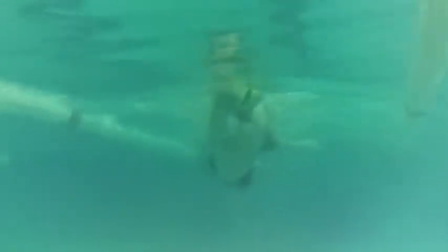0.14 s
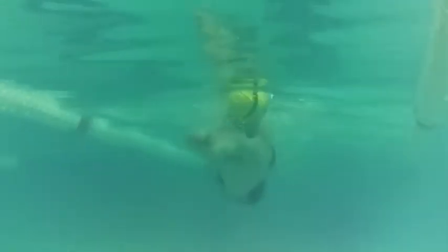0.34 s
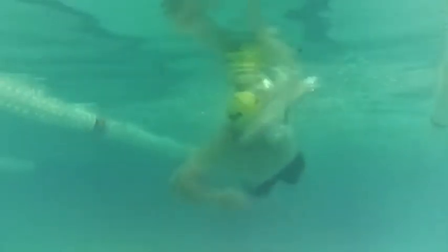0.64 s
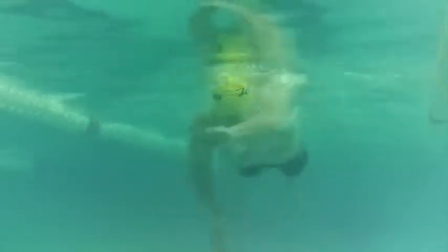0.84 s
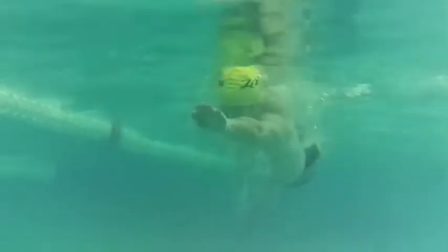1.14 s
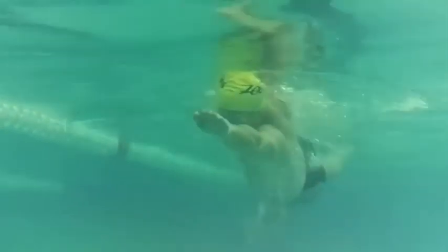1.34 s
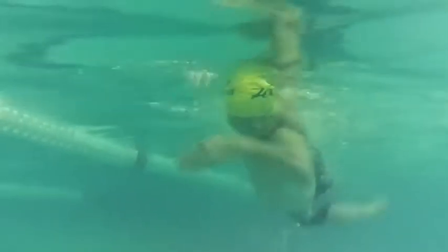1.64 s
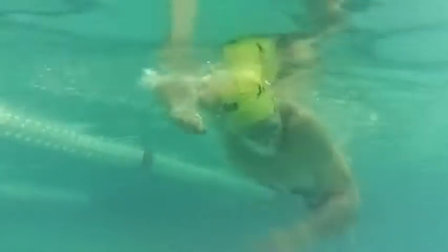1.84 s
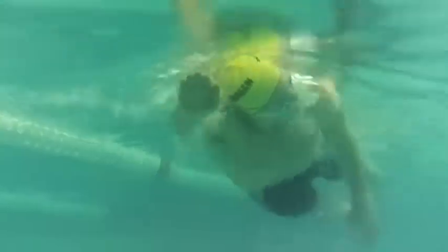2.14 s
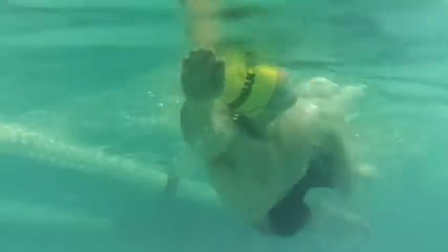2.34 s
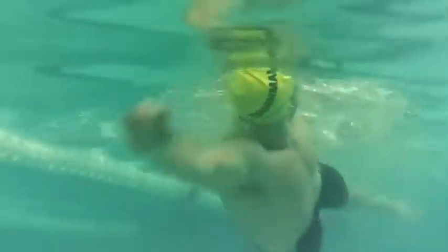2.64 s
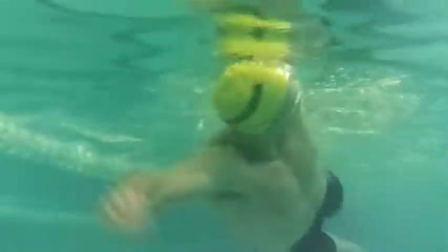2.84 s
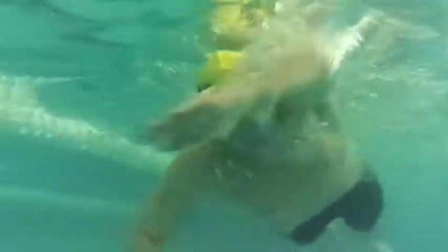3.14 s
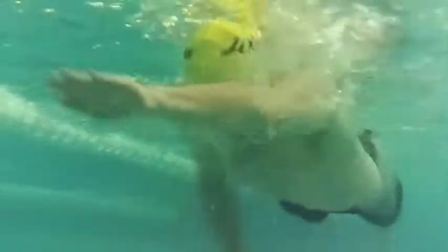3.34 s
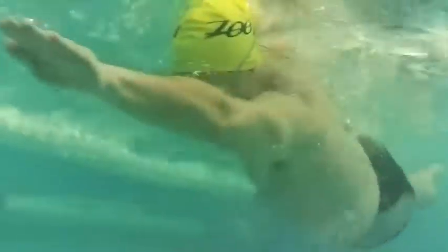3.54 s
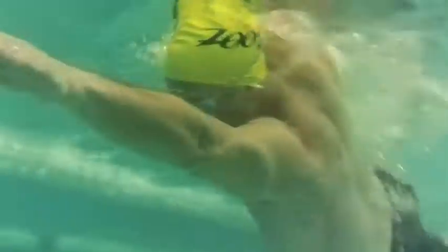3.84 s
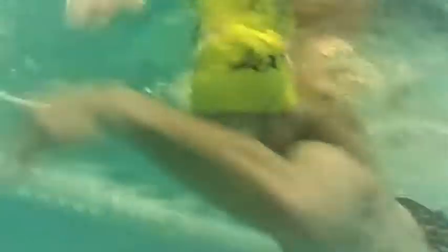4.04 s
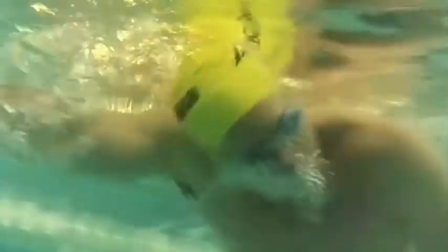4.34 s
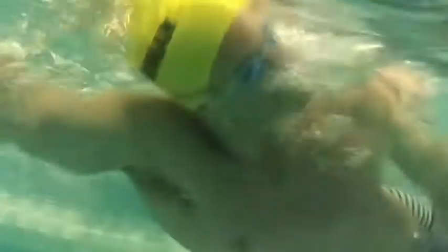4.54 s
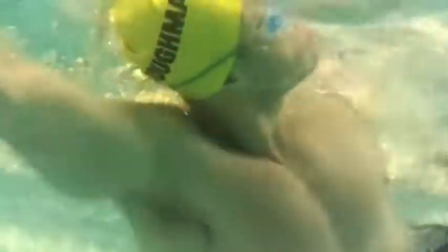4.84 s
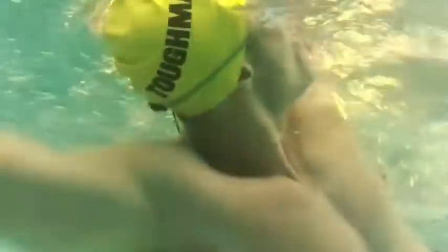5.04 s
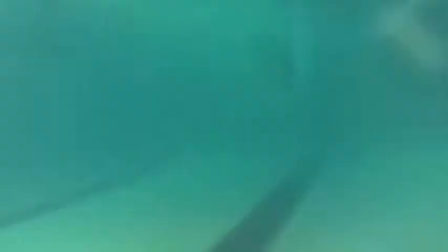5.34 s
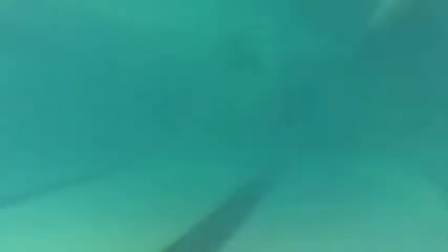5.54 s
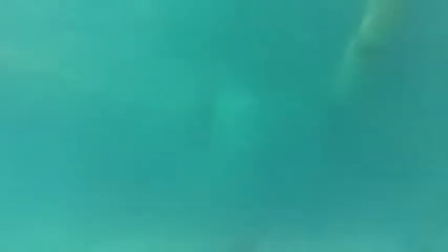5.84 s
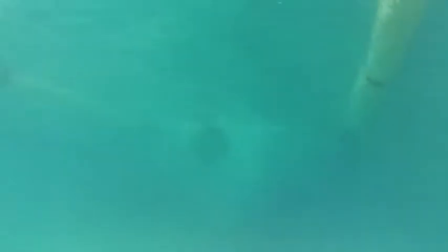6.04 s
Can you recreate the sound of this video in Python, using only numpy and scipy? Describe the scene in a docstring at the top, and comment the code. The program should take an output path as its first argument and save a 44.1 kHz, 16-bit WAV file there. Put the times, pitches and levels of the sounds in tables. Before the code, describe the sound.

Heard from inside a waterproof housing submerged in a pool, the sound is muffled and resonant, with low water rumble, faint hiss and a thin high whine. Tiny taps open it, then gritty squeaks of a grip rubbing at 0.3-0.4 s. A bubbly stroke rushes at 0.7 s, followed by quieter water, pops and chirps. Another surge at 1.9 s brings a sharp pop and short whistling bubble jets near 2.1 s; a weaker one follows at 2.5 s. Rubbing squeaks at 2.9-3.2 s lead into a stroke and a loud, distorted knock at 3.25 s. Deep gurgles continue until another hard knock at 3.94 s. The closest, fullest froth surges at 4.16 and 4.5 s, with plopping bubbles and knocks around 4.65-4.7 s. A lesser stroke at 5.0 s fades among ticks. Complete silence runs from 5.38 to 6.02 s, then dull water and a brief squeaky rub return.

```python
"""A swimmer strokes past under water, heard by a microphone in a waterproof housing below the surface of a pool.
Each stroke is noise and many ringing bubbles; the froth goes through the resonances of the housing walls.
Larger bubbles, pops, chirps, ticks and jets are added one by one, over a rumble of moving water.
Rubs and knocks on the housing overload the microphone. A faint whine and hiss come from the electronics.
The sound drops out for a moment near the end."""
import sys
import numpy as np
from scipy import signal
from scipy.fft import rfft, irfft
from scipy.io import wavfile
from scipy.ndimage import uniform_filter1d

SR = 44100
rng = np.random.default_rng(int(sys.argv[2]) if len(sys.argv) > 2 else 0)


def transcribe(u):
    """Save the signal u as a 16-bit wav file named by the first command-line argument.

    u: samples, shape (n,) or (channels, n), limited to [-1, 1]; the rate is SR.
    q: integer samples, one column per channel.
    """
    v = np.clip(np.atleast_2d(u).T, -1, 1)
    q = np.round(v * 32767).astype(np.int16)
    wavfile.write(sys.argv[1], SR, q)


N = 272538
TIME = np.arange(N) / SR  # seconds

# Water pushing on the housing. Each row: time in seconds, level in dB.
SWELL = [(0, -42.5), (.9, -43.5), (1.15, -50), (1.75, -41), (2.5, -47), (3.2, -40), (3.95, -44),
         (4.15, -39.5), (4.5, -34), (5.35, -46), (6.05, -36.5)]
# Tone of the low rumble. Each row: frequency in Hz, relative strength in dB.
RUMBLE_TONE = [(10, -4), (25, 6), (50, -7.5), (85, -17), (130, -13), (200, -25.5), (260, -29.5), (330, -25),
               (700, -14), (2000, -51.5)]
# Knocks on the housing. Each row: start in seconds, shell ring in dB, body thud in dB, thud pitch in Hz.
KNOCKS = [(0.0378, -29, -14.5, 183), (0.0424, -13.5, -25, 925), (3.2486, 24, 2, 439), (3.938, 28, 7, 469),
          (4.6449, -4, -26.5, 910), (4.6533, .5, 9.5, 979), (4.7003, -14.5, -2.5, 985),
          (4.9477, -31, -16, 950)]
# Grip rubbing on the housing. Each row: start in seconds, length in seconds, level in dB,
# squeak pitch in Hz, pitch scatter as a share.
RUBS = [(0.289, 0.026, -26, 2110, 0.31), (0.3301, 0.023, -9.5, 1831, 0.13), (0.357, 0.01, -8.5, 1772, 0.13),
        (0.383, 0.0048, -13.5, 1760, 0.16), (0.394, 0.029, -16.5, 1760, 0.26),
        (2.901, .0037, -17.5, 1620, .064), (2.905, 0.031, -3.5, 1727, 0.095),
        (2.942, .021, -5.5, 1616, .29), (2.973, 0.0071, -9.5, 1683, 0.23), (3.004, 0.0099, -16, 1736, 0.16),
        (3.022, 0.024, -20, 1710, 0.23), (3.208, 0.016, -12, 1723, .04), (6.137, .05, -5, 1533, 0.26)]
# Resonances of the housing walls. Each row: frequency in Hz, width in Hz, relative strength in dB.
WALL_RESONANCES = [(722, 430, -23.5), (975, 66, -14.5), (1142, 46, -5.5), (1411, 40, -1.5), (1676, 61.3, 9),
                   (1831, 88, 8.5), (2106, 120, -3.5), (2550, 78, -8.5), (2860, 37, -13)]
# Small bubbles bursting close by. Each row: start in seconds, level in dB, pitch in Hz,
# time to fade by 60 dB in seconds.
TICKS = [(.18, -25.5, 6460, 0.0047), (1.542, -16.5, 2880, 0.004), (3.996, -20.5, 2920, .006),
         (4.751, -27, 3880, 0.011), (4.815, -33, 3950, 0.017), (5.035, -15, 2660, 0.0054),
         (5.127, -21, 3340, 0.0035), (5.148, -26, 2430, 0.021), (5.231, -21, 2400, 0.025),
         (5.268, -13, 2610, 0.014)]
# Jets of small bubbles as a hand cuts in. Each row: start in seconds, length in seconds, level in dB, pitch in Hz.
SQUIRTS = [(1.462, 0.0256, -35.5, 2470), (1.911, 0.011, -26, 2400), (2.059, .012, -22, 2690),
           (2.064, .0062, -20.5, 2000), (2.082, 0.059, -23.5, 1850), (2.089, 0.043, -21.5, 2740),
           (2.106, 0.043, -26, 1120), (2.472, 0.04, -24.5, 1920), (2.848, 0.024, -32.5, 1300),
           (3.094, 0.037, -29.5, 2350)]
# The loudest pops of the splashes. Each row: start in seconds, level in dB, pitch in Hz,
# time to fade by 60 dB in seconds.
POPS = [(.094, -22.5, 1730, 0.052), (0.1713, -24, 1760, 0.054), (0.7054, -23.5, 1810, 0.076),
        (0.9435, -15.5, 1840, 0.039), (1.291, -21, 1717, 0.071), (1.472, -23, 1644, 0.16),
        (1.9612, -9, 1795, 0.038), (2.266, -17, 1810, 0.063), (2.6453, -16.5, 1790, 0.045),
        (2.841, -22, 1750, .04), (3.0695, -12.5, 1688, 0.13), (3.345, -15.5, 1800, 0.056),
        (4.117, -21.5, 1734, 0.13), (4.1787, -15.5, 1730, 0.03), (4.2108, -14, 1650, 0.034),
        (4.3339, -12.5, 1776, .06), (4.9484, -10, 1590, 0.01), (5.0283, -20, 1750, 0.087),
        (5.2676, -21, 1804, 0.17), (5.3272, -21.5, 1500, 0.044)]
# The largest single bubbles. Each row: start in seconds, level in dB, pitch in Hz.
BIG_BUBBLES = [(.727, -18, 504), (.704, -27, 243), (.776, -23.5, 510), (0.78, -32, 298),
               (0.888, -13.5, 1078), (.955, -27, 303), (1.19, -32.5, 131), (2.107, -20.5, 266),
               (2.169, -19.5, 425), (2.987, -17.5, 518), (3.128, -21, 361), (3.35, -13, 543),
               (3.353, -17, 268), (3.747, -14, 447), (3.814, -8, 462), (4.216, -12.5, 396),
               (4.329, -8, 439), (4.344, -19.5, 180), (4.507, -9.5, 488), (4.522, -8.5, 257),
               (4.689, -14.5, 530), (4.704, -20.5, 139), (4.949, -22, 132), (4.984, -15.5, 450),
               (5.03, -18, 380), (5.15, -16.5, 412)]
# Air bubbles dragged under, as the swimmer passes. Each row: time in seconds, pitch of the cloud in Hz,
# spread of sizes as a share.
AIR_CLOUD = [(0, 496, 0.065), (1.6, 488, 0.084), (2.1, 480, 0.15), (2.9, 503, .1), (3.6, 443, .15),
             (4.6, 467, .19), (5.2, 420.5, 0.15), (6.1, 500, .1)]
# Tone of the fine spray. Each row: frequency in Hz, relative strength in dB.
SPRAY_TONE = [(1500, -13.5), (2100, -22), (2450, -0.5), (2650, -14), (2850, -6), (3100, -13.5), (3700, -14),
              (4500, -27.5), (6500, -24.5), (9000, -55.5), (14000, -37.5)]
# Added to the resting wash, as the swimmer nears. Each row: time in seconds, change in dB.
NEARNESS = [(0, 1.5), (1.6, 1), (2.2, 4), (4.4, 5), (5.3, -1.5), (6.1, 3)]
# Each arm enters and pulls. Each row: entry in seconds, length of the pull in seconds, rush in dB,
# fine spray in dB, middling bubbles in dB, cloud of air in dB.
STROKES = [(0, 0.013, -35, -49, -43, -46.5), (.22, 0.16, -36.5, -47, -45, -48.5),
           (0.699, 0.26, -30, -42.5, -37, -38.5), (1.419, 0.023, -42, -51, -53, -40.5),
           (1.651, 0.2, -34.5, -46.5, -48, -51), (1.86, 0.33, -26, -40, -37.5, -34),
           (2.47, 0.35, -36, -51, -43.5, -43), (3.06, 0.29, -26.5, -39.5, -43, -33.5),
           (3.54, 0.56, -42, -51.5, -44.5, -31), (4.158, 0.27, -23.5, -34.5, -41.5, -29.5),
           (4.5, 0.28, -30, -41.5, -37.5, -32), (4.97, 0.16, -32, -46.5, -36.5, -40),
           (6.019, 0.18, -44.5, -62, -33.5, -40)]

HISS_DB, WHINE_DB = -57, -55.5
WHINE_HZ, WHINE_FLIPS_PER_S = 7677.3, 58.7
SILENT_S = (5.378, 6.021)  # from, to
CUTOFF_HZ = 14100

# A stroke sets in quickly, builds to the end of the pull and dies away; the air lingers longest.
ENTRY_S, BUILD_DB = 0.0099, 4.5
RUSH_FALL_DB_PER_S, SPRAY_FALL_DB_PER_S = 42, 45
BURBLE_FALL_DB_PER_S, CLOUD_FALL_DB_PER_S = 44.5, 40
# The wash that never stops between strokes, before nearness is added.
RUSH_REST_DB, SPRAY_REST_DB, BURBLE_REST_DB, CLOUD_REST_DB = -39.5, -55.5, -53.5, -55

BIG_BUBBLE_T60_S = 0.068  # time to fade by 60 dB
# Lesser pops come at random, on average a little above the rush.
POPS_PER_S, POP_OVER_RUSH_DB, POP_SPREAD_DB = 7, 3.5, 1.5
POP_HZ, POP_SPREAD_HZ, LESSER_POP_T60_S = 1760, 80, 0.08
# Lone small bubbles chirp out of the spray, higher ones more weakly.
PLIPS_PER_S, PLIP_OVER_SPRAY_DB, PLIP_DB_PER_OCTAVE = 22, 8.5, -4
PLIP_LOW_HZ, PLIP_HIGH_HZ, PLIP_T60_S = 1254, 3913, 0.025


def from_db(db):
    """Turn decibels into gain."""
    return 10 ** (np.asarray(db) / 20)


def rms_one(x):
    """Scale to an average (rms) level of 1."""
    return x / np.sqrt(np.mean(x ** 2) + 1e-20)


def in_time(rows):
    """Draw each column of a table as a curve, with a value at every sample."""
    s, *columns = np.transpose(rows)
    return [np.interp(TIME, s, c) for c in columns]


def add(out, s, sound):
    """Mix a sound in at time s."""
    at = int(np.clip(round(s * SR), 0, N - 1))
    out[at:at + len(sound)] += sound[:N - at]


def low_pass(x, hz, order=2):
    """Take away what lies above hz."""
    return signal.sosfilt(signal.butter(order, min(hz, SR / 2 - 1), fs=SR, output="sos"), x)


def resonate(x, hz, width_hz):
    """Favour one frequency, with a gain of about 1 at its peak."""
    r = np.exp(-np.pi * width_hz / SR)
    feed = np.array([1, 0, -1]) * (1 - r * r) / 2
    feedback = [1, -2 * r * np.cos(2 * np.pi * hz / SR), r * r]
    return signal.lfilter(feed, feedback, x + 1e-18)


def coloured(x, tone):
    """Shape the frequencies of x by a tone table; rms 1."""
    hz, db = np.transpose(tone)
    bins_hz = np.arange(N // 2 + 1) * SR / N
    gain = from_db(np.interp(np.log(bins_hz + 1), np.log(hz), db))
    return rms_one(irfft(rfft(x) * gain, N))


def drift(rate):
    """Wander smoothly at random, with a new target `rate` times a second."""
    return np.interp(TIME * rate, np.arange(N), rng.standard_normal(N))


def evened(x, span_s):
    """Hold the running rms near 1, leaving faster detail."""
    power = np.abs(uniform_filter1d(x ** 2, max(int(span_s * SR), 2)))
    return x / np.sqrt(power + 1e-6 * np.mean(x ** 2))


def gate(length_s, release_s):
    """A quick rise, a hold and a dying tail, over a fifth of a second."""
    t = TIME[:SR // 5]
    return (1 - np.exp(-t / 0.001)) * np.exp(-np.maximum(t - length_s, 0) / release_s)


def crackle(per_s, spread_db, wash):
    """Random collapses of uneven size over a smooth wash of far ones."""
    strength = np.minimum(rng.exponential(1, N), 4)
    sizes = from_db(spread_db * strength) * rng.choice([-1, 1], N)
    return rms_one(sizes * (rng.random(N) < per_s / SR)) + wash * rng.standard_normal(N)


def bubble(hz, t60, rise, onset_s):
    """A bubble rings and climbs in pitch as it nears the surface."""
    t = TIME[:int(t60 * SR) + 2]
    # the pitch climbs from hz by twice the rise
    ring = np.sin(2 * np.pi * hz * t * (1 + rise * t / t60))
    return ring * from_db(-60 * t / t60) * (1 - np.exp(-t / onset_s))


def swarm(per_s, low_hz, high_hz, cycles, spread_db, count=48):
    """Bubbles of many sizes are born at random, a few louder than the rest; rms 1."""
    out = np.zeros(N)
    pitches = np.geomspace(low_hz, high_hz, count)
    rings = [bubble(hz, cycles / hz, rise=0.12, onset_s=0.0015) for hz in pitches]
    for when, size, strength in rng.random((int(per_s * N / SR), 3)):
        at, ring = int(when * N), rings[int(size * count)]
        out[at:at + len(ring)] += 10 ** (spread_db * strength ** 3 / 20) * ring[:N - at]
    return rms_one(out)


def housing(x, wall_hz=3100):
    """Sound passes the walls through their resonances; the top is lost."""
    out = 0
    for k, (hz, width_hz, db) in enumerate(WALL_RESONANCES):
        sign = (-1) ** k  # neighbours push in opposite directions
        out = out + sign * from_db(db) * resonate(x, hz, width_hz)
    return low_pass(out, wall_hz, order=4)


def pool(x, t60=0.21, wet=0.82):
    """Echoes between surface, floor and walls smear a sound."""
    t = TIME[:SR // 3]
    tail = rng.standard_normal(len(t)) * from_db(-60 * t / t60)
    return x + wet * signal.fftconvolve(x, tail / np.sqrt(np.sum(tail ** 2)))[:N]


def electronics():
    """A thin whine that flips its phase at a steady rate, over even hiss."""
    flips = np.sign(np.sin(np.pi * WHINE_FLIPS_PER_S * TIME))
    whine = rms_one(resonate(flips * np.sin(2 * np.pi * WHINE_HZ * TIME), WHINE_HZ, 1400))
    return from_db(WHINE_DB) * whine + from_db(HISS_DB) * rng.standard_normal(N)


def rumble():
    """Slow, lumpy pressure of the moving water: low noise of wandering strength."""
    swell_db, = in_time(SWELL)
    noise = coloured(rng.standard_normal(N), RUMBLE_TONE)
    lumps = evened(noise * from_db(3 * drift(30)), span_s=0.2)
    return from_db(swell_db) * lumps


def knocks(shell_hz=1790, shell_t60=0.0096, thud_t60=0.021):
    """A hard tap rings the shell briefly and shakes the whole body."""
    out = np.zeros(N)
    t = TIME[:SR // 10]
    for s, shell_db, thud_db, thud_hz in KNOCKS:
        crack = rms_one(resonate(rng.standard_normal(len(t)), shell_hz, 1300))
        shell = np.sin(2 * np.pi * shell_hz * t) + 0.49 * crack
        shell = low_pass(shell * from_db(-60 * t / shell_t60), 3400, order=4)
        shake = rms_one(resonate(low_pass(rng.standard_normal(len(t)), thud_hz * 0.37), 330, 422))
        thud = np.sin(2 * np.pi * thud_hz * t) + 0.17 * shake
        thud = thud * from_db(-60 * t / thud_t60) * (1 - np.exp(-t / 0.0016))
        add(out, s, from_db(shell_db) * shell + from_db(thud_db) * thud)
    return out


def rubs(slips_per_s=200, grit=1.74, slip_s=0.0054, wall_db=3.5, count=30):
    """The grip sticks and slips unevenly; each slip squeaks and the wall rings on."""
    out = np.zeros(N)
    for s, length, db, hz, scatter in RUBS:
        shape = gate(length, release_s=0.0073)
        t = TIME[:len(shape)]
        slip_shape = (1 - np.exp(-t / 0.00052)) * np.exp(-t / slip_s)
        squeak = np.zeros(N)
        gaps, detune, strength = rng.random((count, 3)).T
        starts = np.cumsum(0.5 + gaps) - 0.5 - gaps[0]  # counted in average slips, the first at 0
        for at, off, force in zip(starts, detune - 0.5, 0.5 + strength):
            slip = np.sin(2 * np.pi * hz * (1 + scatter * off) * t) * slip_shape
            add(squeak, at / slips_per_s, force * slip)
        squeak = evened(low_pass(squeak[:len(t)], 2480, order=4), span_s=0.008)
        # rough skin adds a scrape below the squeak, the more so the more uneven the slips
        scrape = resonate(resonate(rng.standard_normal(len(t)), hz * 0.68, 700), hz * 0.94, 1000)
        scrape = rms_one(low_pass(scrape, 2500, order=4))
        scrape = signal.sosfilt(signal.butter(4, 900, "high", fs=SR, output="sos"), scrape)
        add(out, s, from_db(db) * shape * (squeak + grit * scatter * scrape))
    wall = resonate(out, 1665, 12)
    return out + from_db(wall_db) * wall


def ticks():
    """A bursting bubble is a soft snap with a short ping."""
    out = np.zeros(N)
    for s, db, hz, t60 in TICKS:
        ping = bubble(hz, t60, rise=0.045, onset_s=0.00041)
        t = TIME[:len(ping)]
        snap = rms_one(resonate(resonate(rng.standard_normal(len(t)), hz, 1800), hz, 3000))
        snap = snap * np.exp(-t / 0.00071)
        add(out, s, from_db(db) * (1.2 * ping + 0.21 * snap))
    return out


def plips(spray_gain):
    """Now and then a small bubble pinches off close by and chirps upwards."""
    out = np.zeros(N)
    range_octaves = np.log2(PLIP_HIGH_HZ / PLIP_LOW_HZ)
    for k, (when, size, strength) in enumerate(rng.random((int(PLIPS_PER_S * N / SR), 3))):
        s = (k + when) / PLIPS_PER_S
        octaves = size * range_octaves
        over_db = PLIP_OVER_SPRAY_DB + PLIP_DB_PER_OCTAVE * octaves + 6 * strength
        gain = np.interp(s, TIME, spray_gain) * from_db(over_db)
        add(out, s, gain * bubble(PLIP_LOW_HZ * 2 ** octaves, PLIP_T60_S, rise=0.055, onset_s=0.0015))
    return out


def squirts():
    """A jet sheds bubbles of nearly one size: a short, rough whistle."""
    out = np.zeros(N)
    for s, length, db, hz in SQUIRTS:
        shape = gate(length, release_s=0.0038)
        jet = resonate(resonate(rng.standard_normal(len(shape)), hz, 220), hz, 450)
        add(out, s, from_db(db) * shape * evened(jet, span_s=0.016))
    return out


def pop(hz, t60):
    """A small bubble snaps; its echoes off the surface ring the housing."""
    t = TIME[:SR // 8]
    echoes = rms_one(resonate(housing(rng.standard_normal(len(t))), hz, 1100))
    ping = np.sin(2 * np.pi * hz * t) * np.exp(-t / 0.016)
    ring = evened(echoes + 2.2 * ping, span_s=0.0039)
    return ring * from_db(-60 * t / t60) * (1 - np.exp(-t / 0.00035))


def pops(rush_gain):
    """A few loud pops, and a scatter of lesser ones that follow the rush."""
    out = np.zeros(N)
    for s, db, hz, t60 in POPS:
        add(out, s, from_db(db) * pop(hz, t60))
    for k in range(int(POPS_PER_S * N / SR)):
        s = (k + rng.random()) / POPS_PER_S
        strength, size = rng.standard_normal(2)
        gain = np.interp(s, TIME, rush_gain) * from_db(POP_OVER_RUSH_DB + POP_SPREAD_DB * strength)
        add(out, s, gain * pop(POP_HZ + POP_SPREAD_HZ * size, LESSER_POP_T60_S))
    return out


def gulps():
    """Large single bubbles break away from the swimmer, each ringing at its own pitch."""
    out = np.zeros(N)
    for s, db, hz in BIG_BUBBLES:
        add(out, s, from_db(db) * bubble(hz, BIG_BUBBLE_T60_S, rise=0.024, onset_s=0.0041))
    return out


def cloud(gain, per_s=300, cycles=32, clump_db=5.0):
    """Air dragged under: many overlapping bubbles, their sizes scattered about that of the cloud."""
    hz, spread = in_time(AIR_CLOUD)
    out = np.zeros(N)
    for when, size, strength in rng.random((int(per_s * N / SR), 3)):
        at = int(when * N)
        # most pitches fall near the middle, a few far off
        pitch = hz[at] * np.clip((size / (1 - size)) ** (spread[at] / 2), 0.4, 2)
        ring = bubble(pitch, cycles / pitch, rise=0.018, onset_s=0.0059)
        add(out, when * N / SR, from_db(-10 * strength) * ring)
    # the body of the housing favours one low note and throbs at a lower one
    gurgle = evened(resonate(out, 485, 260), span_s=0.028)
    throb = resonate(crackle(per_s=55, spread_db=2.5, wash=0.12), 260, 45)
    throb = rms_one(resonate(throb, 340, 260))
    return (gurgle + from_db(-14.5) * throb) * gain * from_db(clump_db * drift(25))


def burble(gain):
    """Each stroke sheds middling bubbles that chirp upwards."""
    chirps = swarm(per_s=150, low_hz=673.6, high_hz=1550, cycles=19, spread_db=7)
    return evened(resonate(chirps, 1080, 570), span_s=0.54) * gain


def churn(rush_gain, spray_gain, rush_clump_db=2.1, spray_clump_db=2.8):
    """Clumps of bubbles and froth ring the housing, with finer spray above."""
    clumps = drift(45)
    froth = pool(swarm(per_s=600, low_hz=738, high_hz=3624, cycles=60.3, spread_db=14))
    froth = froth + 0.75 * crackle(per_s=905, spread_db=5.5, wash=0.97)
    rush = evened(housing(froth), span_s=0.022)
    fizz = swarm(per_s=490, low_hz=2118, high_hz=5220, cycles=120, spread_db=2.5)
    fizz = fizz + 1.7 * crackle(per_s=1500, spread_db=0.0, wash=0.7)
    spray = evened(coloured(fizz, SPRAY_TONE), span_s=0.039)
    rush = rush * rush_gain * from_db(rush_clump_db * clumps)
    return rush + spray * spray_gain * from_db(spray_clump_db * clumps)


def stroke_level(levels_db, fall_db_per_s, rest_db):
    """Gain of one layer: the strokes swell and fade, their powers adding to the resting wash."""
    coarse = TIME[::64]  # every 64th sample is fine enough
    power = from_db(rest_db + np.interp(coarse, *np.transpose(NEARNESS))) ** 2
    for (entry, pull, *_), level_db in zip(STROKES, levels_db):
        t = np.maximum(coarse - entry, 0)
        build_db = -BUILD_DB * np.maximum(1 - t / pull, 0)
        fall_db = -fall_db_per_s * np.maximum(t - pull, 0)
        power = power + (from_db(level_db + build_db + fall_db) * (1 - np.exp(-t / ENTRY_S))) ** 2
    return np.interp(TIME, coarse, np.sqrt(power))


def scene():
    """Everything that reaches the one microphone."""
    rush_db, spray_db, burble_db, cloud_db = np.transpose(STROKES)[2:]
    rush = stroke_level(rush_db, RUSH_FALL_DB_PER_S, RUSH_REST_DB)
    spray = stroke_level(spray_db, SPRAY_FALL_DB_PER_S, SPRAY_REST_DB)
    shed = stroke_level(burble_db, BURBLE_FALL_DB_PER_S, BURBLE_REST_DB)
    air = stroke_level(cloud_db, CLOUD_FALL_DB_PER_S, CLOUD_REST_DB)
    strokes = churn(rush, spray) + burble(shed) + cloud(air)
    single_bubbles = gulps() + pops(rush) + squirts() + plips(spray) + ticks()
    handling = rubs() + knocks()
    return (strokes + single_bubbles + handling + rumble() + electronics())[None]


def record(dry, top=0.64):
    """The input overloads flat, the sound is muted for a moment, the top is cut."""
    clipped = dry / (1 + (dry / top) ** 12) ** (1 / 12)
    audible = 1.0 * ((TIME < SILENT_S[0]) | (TIME > SILENT_S[1]))
    audible = uniform_filter1d(audible, size=128)  # soften the edges of the gap
    return signal.fftconvolve(clipped * audible, signal.firwin(161, CUTOFF_HZ, fs=SR)[None], "same")


dry = scene()
out = record(dry)
transcribe(out)
```